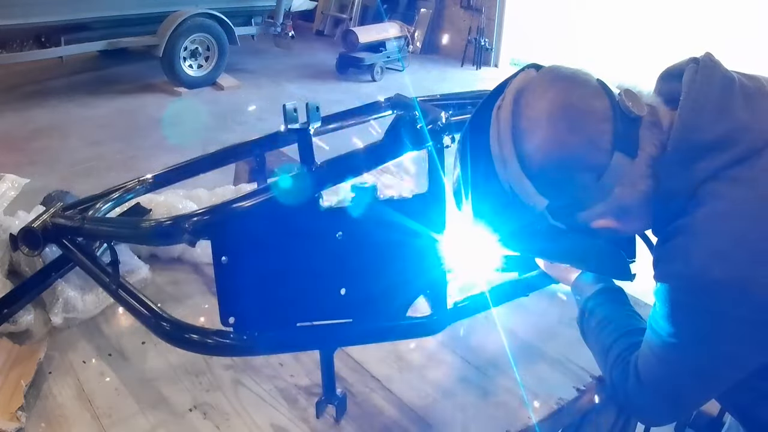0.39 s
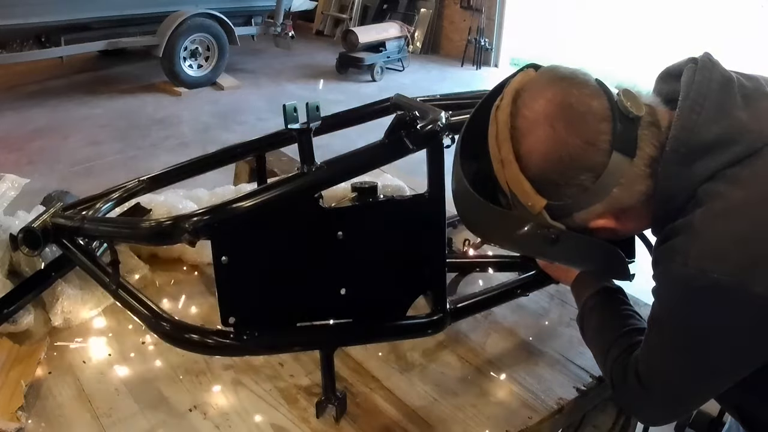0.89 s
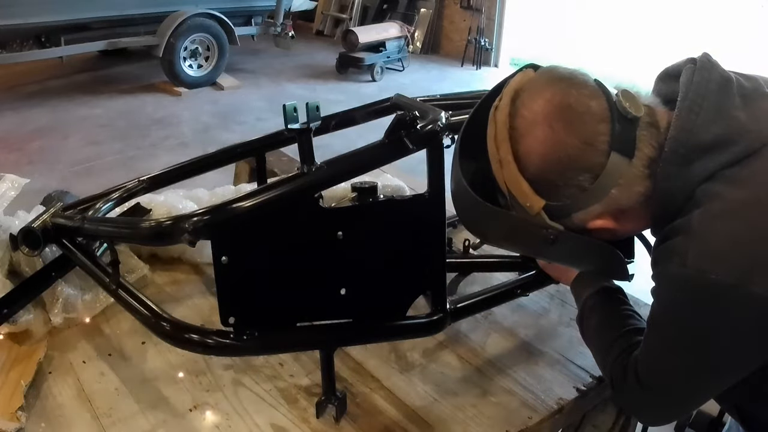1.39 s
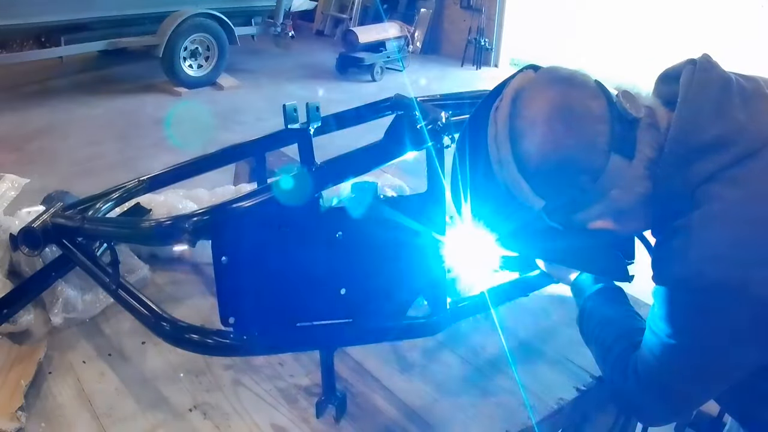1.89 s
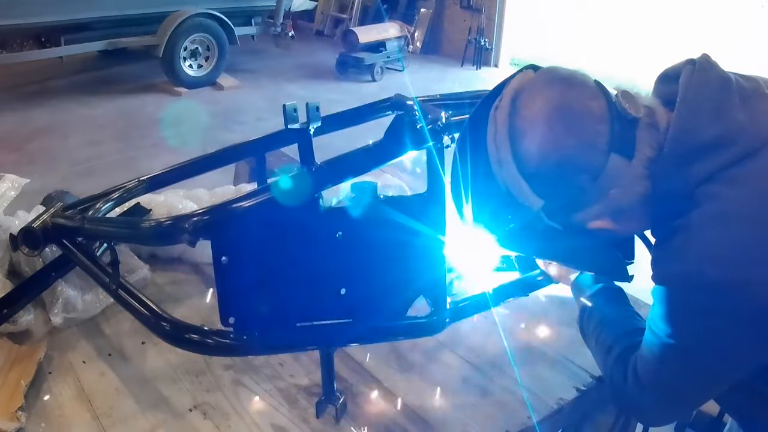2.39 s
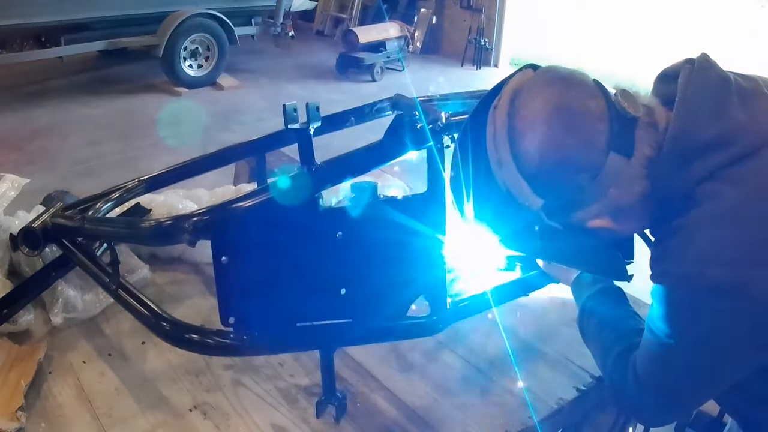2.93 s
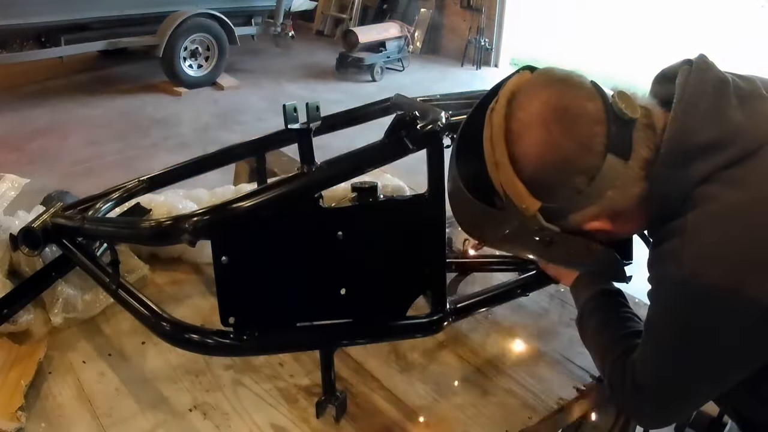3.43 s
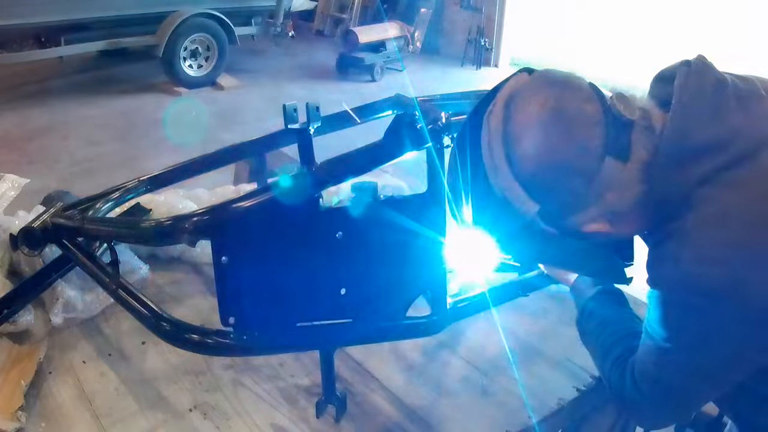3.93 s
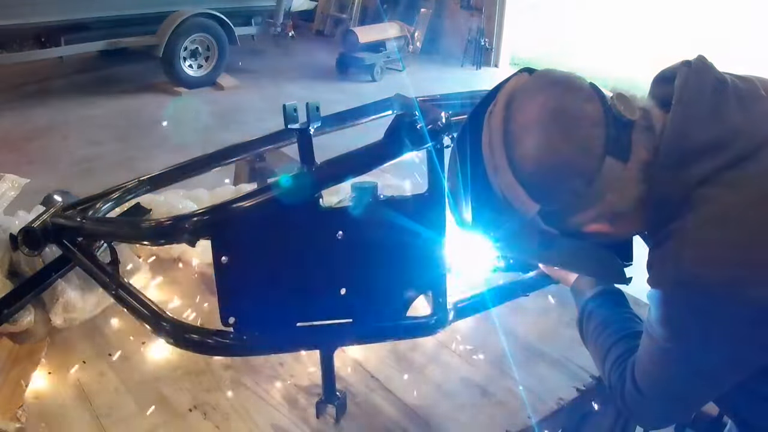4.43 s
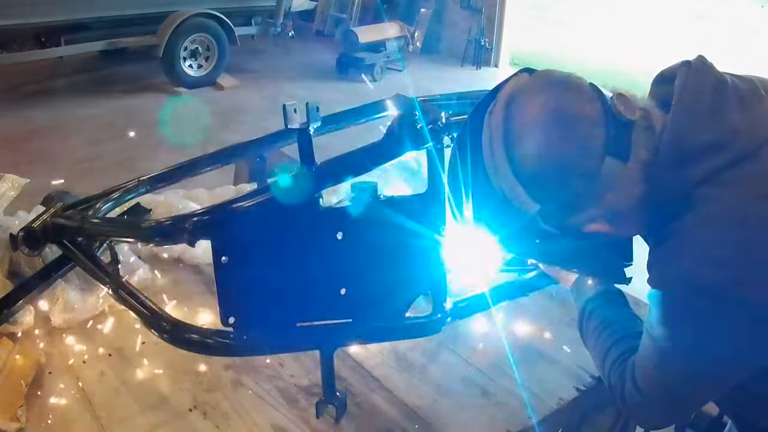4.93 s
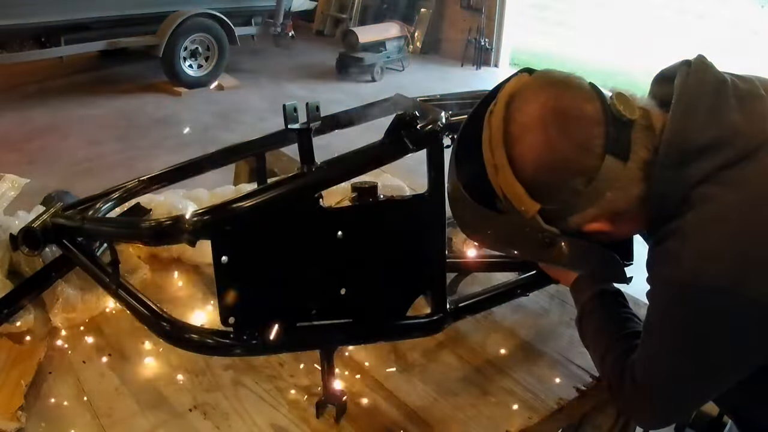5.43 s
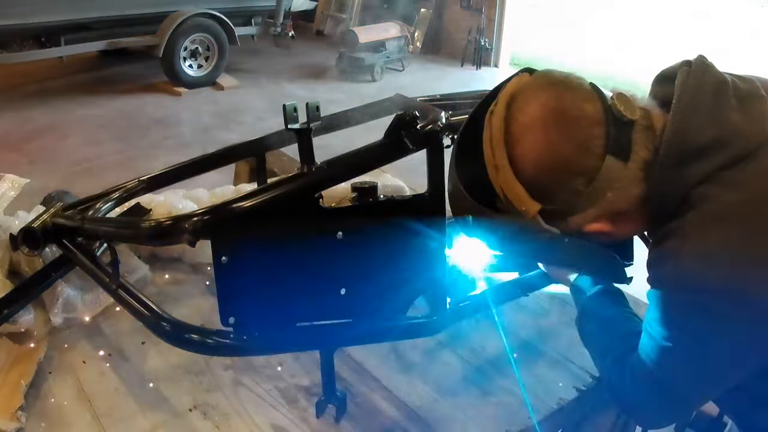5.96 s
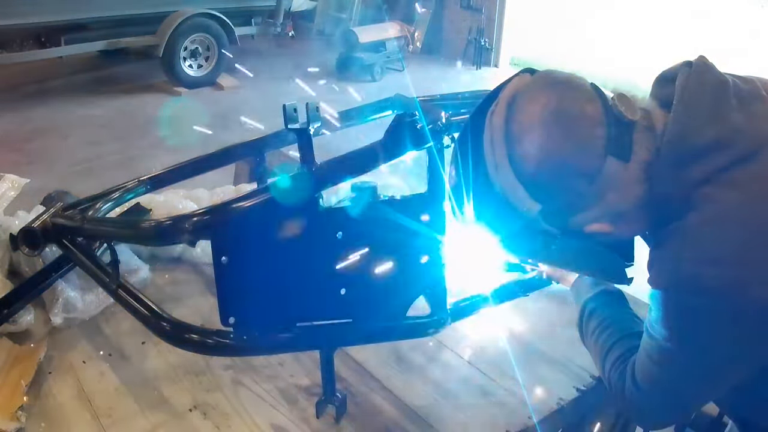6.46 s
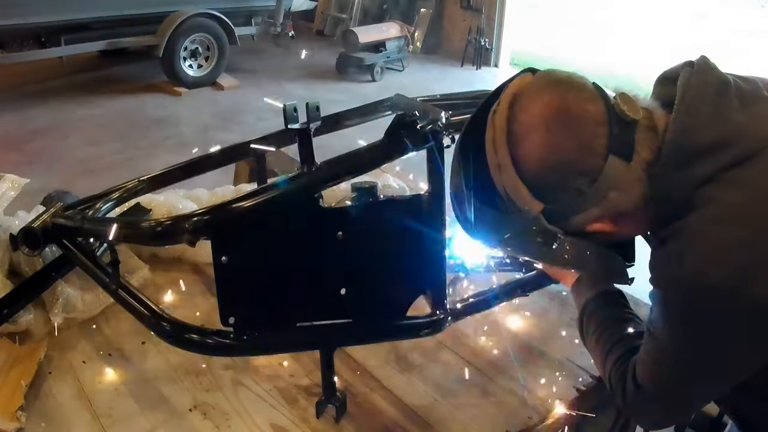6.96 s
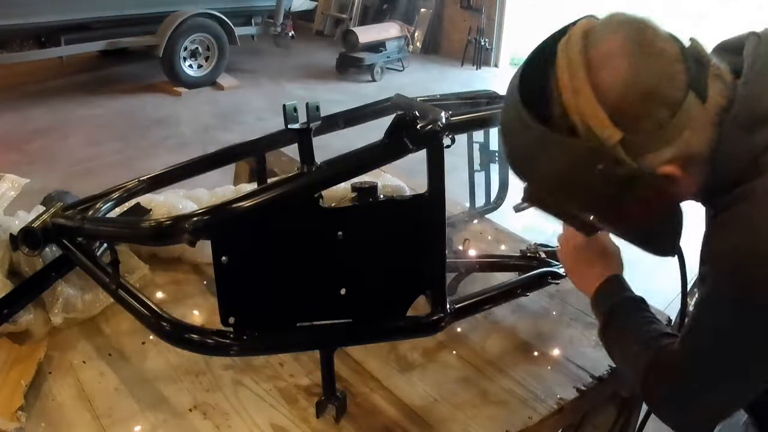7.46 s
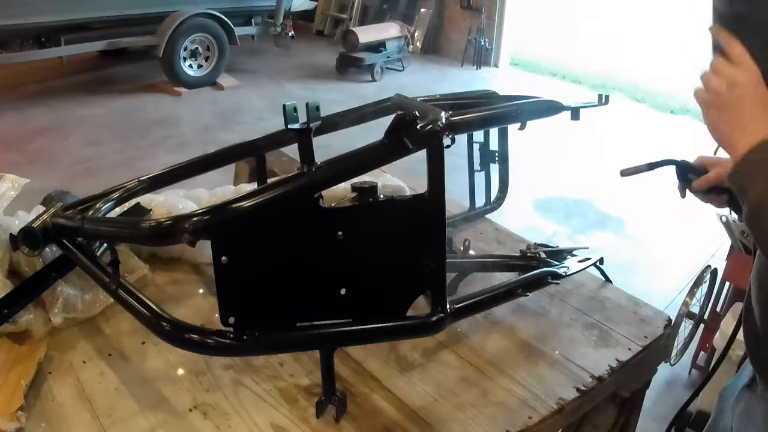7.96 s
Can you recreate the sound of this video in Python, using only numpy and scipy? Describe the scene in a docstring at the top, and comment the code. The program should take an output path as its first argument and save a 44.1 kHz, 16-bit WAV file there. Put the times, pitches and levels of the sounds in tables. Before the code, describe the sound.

A wire-feed welder crackles close by on a steel tube frame in a garage. Dense, loud, distorted pops and bright sizzle stop after half a second, a few lone snaps follow, then three more ragged welds come with pauses between. A steady fan hum and airy gas hiss continue underneath and are left alone at the end. The mono microphone overloads on the biggest pops.

```python
"""A wire-feed welding arc works in four short welds on a tubular steel frame in a garage. Each short circuit
of the wire ends in a sharp pop: a pressure kick, a puff of metal vapour and a low push of gas. Spatter and
plasma sizzle fill the welds; tubes, near surfaces, walls and a room tail answer. Under it all, and clearest
between welds, the machine's fan hums and the shielding gas hisses. The loudest pops overload a mono microphone."""
import sys
import numpy as np
from scipy import signal
from scipy.fft import rfft, irfft, next_fast_len
from scipy.io import wavfile
from scipy.ndimage import map_coordinates

SR = 44100
rng = np.random.default_rng(int(sys.argv[2]) if len(sys.argv) > 2 else 0)


def gain_from_db(level_db):
    """Convert decibel levels to linear amplitude factors (20 dB per decade)."""
    decades = np.asarray(level_db, float) / 20
    return 10 ** decades


def output_pcm(signal):
    """Save a mono or channel-first signal as 16-bit PCM at the path in sys.argv[1].

    Samples are clipped to [-1, 1] before scaling.
    """
    pcm = np.clip(np.atleast_2d(signal).T, -1, 1) * 32767
    wavfile.write(sys.argv[1], SR, np.round(pcm).astype(np.int16))


N = 357102  # length in samples


def unit(x):
    """Scales a signal to rms 1."""
    return x / np.sqrt(np.mean(x ** 2) + 1e-20)


def along(points, hz, column=1):
    """Reads one column of a frequency table on a log axis."""
    rows = np.transpose(points)
    return np.interp(np.log(hz + 1), np.log(rows[0] + 1), rows[column])


def wobble(rate):
    """A smooth random curve with rate knots a second."""
    knots = rng.standard_normal(int(N * rate / SR) + 4)
    return map_coordinates(knots, [np.arange(N) * rate / SR])


def coloured(points):
    """Noise of rms 1 with the given spectral shape."""
    size = next_fast_len(N)
    spectrum = rfft(rng.standard_normal(size))
    shape = gain_from_db(along(points, np.fft.rfftfreq(size, 1 / SR)))
    return unit(irfft(spectrum * shape, size)[:N])


def causal(points, size=4096):
    """The shortest causal (minimum-phase) response with the given spectrum, by folding its cepstrum."""
    spectrum = gain_from_db(along(points, np.fft.rfftfreq(size, 1 / SR)))
    cepstrum = irfft(np.log(spectrum), size)
    cepstrum[1:size // 2] *= 2
    cepstrum[size // 2 + 1:] = 0
    return irfft(np.exp(rfft(cepstrum)), size)[:size // 2]


def copies(rows):
    """Turns rows of delay and level into a response of single echoes."""
    ms, db = np.transpose(rows)
    return np.bincount(np.round(ms * SR / 1000).astype(int), gain_from_db(db))


def convolve(x, response):
    """Plays x through a response, cut to the scene's length."""
    return signal.fftconvolve(x, response)[:N]


# Fan and transformer tones. Each row: frequency in Hz, usual level in dB rms ahead of the input stage.
MACHINE_TONES = [(339, -71), (593.6, -60.5), (678, -71.5), (1186.6, -74), (1780, -70)]
# Spectral shape of the fan's air noise. Each row: frequency in Hz, relative level in dB per Hz.
FAN_COLOUR = [(25, -35.5), (100, -17), (200, -7), (240, -3), (600, -2.5), (800, -4), (2000, -6.5),
              (6000, -13), (11000, -11.5), (16000, -21)]


def machine():
    """The fan's rush of air and steady tones that waver slightly in level and together in pitch."""
    t = np.arange(N) / SR
    drift = 0.000324 * np.cumsum(wobble(2.74)) / SR  # seconds of phase drift
    hum = np.zeros(N)
    for hz, db in MACHINE_TONES:
        level = gain_from_db(db + 0.99 * wobble(6.9)) * np.sqrt(2)  # rms to peak
        hum += level * np.sin(2 * np.pi * hz * (t + drift))
    rush = gain_from_db(-59.0 + 0.44 * wobble(3.72)) * coloured(FAN_COLOUR)
    return hum + rush


# Spectral shape of gas leaving the nozzle. Each row: frequency in Hz, relative level in dB per Hz.
GAS_COLOUR = [(3000, -33), (5000, -7.5), (6000, -11), (8000, -4), (10000, 1), (11500, -31.5), (16000, -37)]
# Gas hiss over time. Each row: time in seconds, usual level of the direct hiss in dB rms ahead of the input
# stage, delay of a second arrival off the frame in ms, share of that arrival from 0 to 1.
NOZZLE_PATHS = [(0, -56.5, .2, .1), (1.1, -55, 0.13, 0), (1.7, -56, 0.21, 0.03), (3.6, -57.5, 0.167, 0.05),
                (5.7, -57.5, 0.18, 0.03), (7.25, -61.5, 0.15, .4), (7.5, -58.5, 0.328, 0.34),
                (7.75, -58.5, .5, 0.2), (8.1, -59, .85, 0.61)]


def gas():
    """Hiss heard twice; as the torch is lifted away the comb between both paths slides."""
    s, *columns = np.transpose(NOZZLE_PATHS)
    samples = np.arange(N)
    db, delay_ms, share = [np.interp(samples / SR, s, column) for column in columns]
    direct = coloured(GAS_COLOUR)
    reflected = map_coordinates(direct, [samples - delay_ms * SR / 1000], mode="wrap")
    return gain_from_db(db + 0.88 * wobble(2.0)) * (direct + share * reflected)


# Ring of the tubes. Each row: frequency in Hz, starting level in dB, t60 in seconds.
TUBE_MODES = [(265, -47, 0.13), (419, -49.5, 0.13), (4483, -24.5, 0.012), (4907, -27, 0.0076),
              (5135, -19.5, 0.0057), (6875, -20.5, 0.0051)]


def frame(x):
    """The steel tubes ring briefly after every pop, as a bank of decaying sines."""
    t = np.arange(SR // 5) / SR
    ring = sum(gain_from_db(db - 60 * t / t60) * np.sin(2 * np.pi * hz * t) for hz, db, t60 in TUBE_MODES)
    return convolve(x, ring)


# Copies from tubes and bench close to the arc. Each row: delay in ms, level in dB before colouring.
NEAR_COPIES = [(.36, -15), (.59, -12), (.86, -16), (1.22, -15), (1.7, -17), (2.1, -19), (2.7, -21),
               (3.4, -20)]
# Echoes of hard surfaces further off. Each row: delay in ms, level in dB before colouring.
WALL_ECHOES = [(7.66, -7), (13.06, -20), (14.74, -21), (15.9, -19), (20.34, -22), (24.9, -22), (33.3, -23)]
# Tubes and walls return less bass. Each row: frequency in Hz, gain in dB.
SURFACE_COLOUR = [(300, -10.5), (1800, -1), (4000, 8.5), (16000, 2)]
# The garage's tail. Each row: frequency in Hz, t60 in seconds, relative starting level in dB.
TAIL_BANDS = [(200, 0.866, 0), (503, 0.81, -2), (1260, 0.74, -6), (2190, 0.69, 10.5), (4480, 0.81, -2),
              (9780, 0.48, -3.5), (15000, 0.245, 2)]


def garage(x):
    """Direct sound and tube ring, near copies, walls, then a tail that swells in and dies band by band."""
    bright = convolve(x, causal(SURFACE_COLOUR))
    near = convolve(bright, copies(NEAR_COPIES))
    walls = convolve(bright + 0.15 * near, copies(WALL_ECHOES))
    hz, t, bands = signal.stft(rng.standard_normal(SR + SR // 2), SR, nperseg=256)
    start_db = along(TAIL_BANDS, hz, column=2)[:, None]
    t60 = along(TAIL_BANDS, hz)[:, None]
    tail = signal.istft(bands * gain_from_db(start_db - 60 * t / t60), SR, nperseg=256)[1]
    tail *= np.clip(np.arange(len(tail)) / SR / 0.0088 - .2, 0, 1)  # silent at first, full after about 11 ms
    return x + frame(x) + near + walls + gain_from_db(-31.0) * convolve(x, tail)


def bursts(times, db, fizz_db, fizz_ms):
    """Pressure kicks, each with a random puff of metal vapour that falls 60 dB in fizz_ms."""
    t = np.arange(256)  # samples after the kick
    fade = gain_from_db(fizz_db - 60 * t / (fizz_ms * SR / 1000))
    puff = fade * rng.standard_normal((len(times), len(t)))
    shape = gain_from_db(db)[:, None] * ((t == 0) + puff)
    where = np.round(np.asarray(times) * SR).astype(int)[:, None] + t
    return np.bincount(where.ravel(), shape.ravel(), N + SR)[:N]


# While the arc burns. Each row: start in seconds, end in seconds, level of the smallest spatter in dB, usual
# sizzle level in dB (both before the snap colour), offset of the low push in dB.
WELD_SPANS = [(0, 0.544, -42, -31, -0.5), (2.001, 3.091, -8, -47, 1.4), (3.897, 5.241, -27, -37, 1),
              (6.216, 6.982, -23, -37, 2.5)]


def spatter():
    """Small random metal pops at about 50 a second in each weld: many small, a few larger."""
    pops = np.zeros(N)
    for start, end, smallest_db, _, _ in WELD_SPANS:
        draw = rng.random((round(50 * (end - start)), 2))
        times = start + (end - start) * draw[:, 0]
        size_db = smallest_db - 4 * np.log(1 - .9 * draw[:, 1])
        pops += bursts(times, size_db, fizz_db=-19.5, fizz_ms=5.7)
    return pops


def sizzle():
    """The plasma's noise while the arc burns, flickering slightly in level."""
    t = np.arange(N) / SR
    noise = np.zeros(N)
    for start, end, _, sizzle_db, _ in WELD_SPANS:
        burning = (t > start) * (t < end)
        noise += gain_from_db(sizzle_db + 0.8 * wobble(60)) * rng.standard_normal(N) * burning
    return noise


# Ordinary dripping of the wire between loud pops. Each row: time in seconds, short circuits per second,
# usual kick level in dB before scatter.
DRIP_RATE = [(0, 140, 14), (.12, 125, -4), (.14, 80, 0), (.25, 80, -6.5), (.27, 140.3, -3.5), (.36, 130, 5),
             (.5, 121.3, 0), (.56, 129.3, -1.5), (2.0, 80, -6), (2.25, 104, -0.5), (3.08, 85, -2.5),
             (3.9, 72, -1), (4.07, 65, -10.5), (4.1, 110, 0.5), (4.16, 95, -6), (4.2, 68, -7),
             (4.6, 57.4, -1.5), (5.24, 62, -6), (6.23, 86, -2.5), (6.355, 104, 3.5), (6.43, 66, -4.5),
             (6.6, 55, -4), (6.98, 60, -3)]
# The wire sticks and nothing drips. Each row: from in seconds, to in seconds.
WIRE_STALLS = [(.143, .16), (.385, .4), (2.768, 2.783), (4.012, 4.043), (4.28, 4.312), (4.372, 4.391),
               (4.676, 4.701), (4.842, 4.857), (4.996, 5.025), (6.3, 6.315), (6.36, 6.389), (6.452, 6.508)]


def drips():
    """Smaller pops share out the time between two loud ones; the beat before a loud one is longer."""
    wait, jitter, scatter_db = 1.4, .09, 3  # beats for a big drop to grow; beat scatter; size scatter in dB
    after_s = .03  # dripping may run this long past the weld's end
    s = np.transpose(POP_STRIKES)[0]
    before, gap = s[:-1], np.diff(s)
    at, rate, level_db = np.transpose(DRIP_RATE)
    burning = sum((before > w[0]) & (before + gap < w[1] + after_s) for w in WELD_SPANS)
    shorts = gap * np.interp(before + gap / 2, at, rate)
    count = burning * np.round(shorts - wait).clip(0)
    beat = np.arange(1, 16)
    chance = rng.standard_normal((2, len(gap), len(beat)))
    beat_s = (gap / (count + wait))[:, None]
    times = before[:, None] + beat_s * (beat + jitter * chance[0])
    size_db = np.interp(times, at, level_db) + scatter_db * chance[1].clip(-3, 1.5)
    stalled = np.any([(times > a) & (times < b) for a, b in WIRE_STALLS], axis=0)
    used = (beat <= count[:, None]) & ~stalled
    return times[used], size_db[used]


# Colour of the low push of expanding gas. Each row: frequency in Hz, gain in dB.
PUSH_COLOUR = [(60, -40), (250, -17), (450, -10), (1000, -5), (1550, -3.5), (2200, -14.5), (5000, -48.5)]


def gas_push(s, db):
    """Each pop's gas expands as a low thud; big bursts move more gas."""
    ends, push_db = np.transpose(WELD_SPANS)[[1, 4]]
    weld = np.searchsorted(ends, s).clip(0, len(WELD_SPANS) - 1)
    push = gain_from_db(0.79 * db + push_db[weld] + rng.normal(0, 2.2, len(s)))
    kicks = np.bincount(np.round(s * SR).astype(int), push, N)
    return convolve(kicks, causal(PUSH_COLOUR))


# The loudest pops and the lone strikes, as the molten bridge bursts and the arc lights again.
# Each row: time in seconds, kick level in dB ahead of the room and the input stage.
POP_STRIKES = [(0.0323, 5), (0.0541, 5), (0.0667, 4), (0.0789, 5), (0.1295, 4), (0.1606, 5), (0.1734, 5),
               (0.1858, 4), (0.2018, 4), (0.2158, 5), (0.2315, 5), (0.2456, 5), (0.2699, 6), (0.3016, 4),
               (0.3615, 6), (0.3788, 5), (0.4, 3), (0.4088, 6), (0.4177, 5), (0.4269, 6), (0.4358, 5),
               (0.445, 4), (0.461, 7), (0.499, 5), (0.5173, 3), (0.54, 0), (0.5626, -5), (1.7348, 5),
               (1.7833, 4), (1.8416, 5), (1.8971, 4), (1.91, 5), (1.9269, 1), (1.9368, -5), (2.0089, 4),
               (2.0373, 1), (2.0954, 1), (2.1689, 2), (2.203, 7), (2.2585, 3), (2.2965, 2), (2.3202, 2),
               (2.3438, 6), (2.3682, 3), (2.4698, 4), (2.4917, 1), (2.591, 2), (2.6085, 4), (2.7084, 3),
               (2.7586, 3), (2.7836, 5), (2.8155, 6), (2.8339, 2), (2.8888, 3), (2.9054, 3), (2.9732, 2),
               (3.0149, 6), (3.0299, 2), (3.0456, 2), (3.078, -4), (3.8061, -9), (3.906, 5), (3.9207, 6),
               (3.9359, 3), (3.9654, 5), (3.9866, 6), (4.0438, 6), (4.0827, 5), (4.0941, 6), (4.1298, 5),
               (4.1392, 6), (4.1608, 5), (4.1855, 4), (4.2341, 4), (4.3123, 7), (4.3311, 4), (4.3917, 2),
               (4.4426, 6), (4.4827, 5), (4.5049, 5), (4.5259, 5), (4.6134, 6), (4.7015, 7), (4.7358, 7),
               (4.7556, 5), (4.7721, 4), (4.806, 2), (4.8573, 6), (4.9309, 4), (4.9454, 5), (4.9923, 3),
               (5.0252, 6), (5.1125, 4), (5.1495, 3), (5.2403, -6), (6.0003, -1), (6.1593, -5), (6.2265, 6),
               (6.2788, 1), (6.3157, 2), (6.3351, 7), (6.3543, 2), (6.3891, 3), (6.4011, 3), (6.4798, 0),
               (6.5086, 3), (6.5435, 2), (6.5669, 4), (6.6489, 3), (6.6759, 3), (6.7711, 4), (6.803, 4),
               (6.8762, 2), (6.9856, -6)]
# Spectral shape of a pop at the microphone. Each row: frequency in Hz, relative level in dB per Hz.
SNAP_COLOUR = [(100, -33.5), (260, -29.5), (900, -23.5), (2400, -26), (3400, -20), (4200, -14.5),
               (4800, -10.5), (5900, -11.5), (6700, -5), (9900, 2.5), (12600, -9), (13500, -12.5),
               (14800, -11), (17000, -17)]


def arc():
    """Big and dripping pops, spatter and sizzle share one sharp colour; a low push joins each big or drip pop."""
    s, db = np.hstack([np.transpose(POP_STRIKES), drips()])
    pops = bursts(s, db, fizz_db=-19, fizz_ms=6)
    snap = causal(SNAP_COLOUR)
    snap /= np.abs(snap).max()
    return convolve(pops + spatter() + sizzle(), snap) + gas_push(s, db)


def scene():
    """One microphone feeds both channels."""
    mono = garage(arc()) + machine() + gas()
    return np.tile(mono, (2, 1))


def roll_off(x):
    """The treble ends steeply here."""
    return signal.sosfilt(signal.butter(12, 16820, fs=SR, output="sos"), x)


# Band of the recorder. Each row: frequency in Hz, gain in dB.
RECORDER_BAND = [(30, -11), (130, -5), (205, -7), (245, -0.5), (15800, -0.5), (15950, -60)]


def record(dry):
    """The input stage clips the biggest pops; the recorder then trims bass and top treble."""
    top, hardness = .99, 7  # clipping ceiling (full scale 1); sharpness of the knee
    loud = gain_from_db(-1.5) * dry
    clipped = loud / (1 + np.abs(loud / top) ** hardness) ** (1 / hardness)
    band = gain_from_db(along(RECORDER_BAND, np.fft.rfftfreq(N, 1 / SR)))
    mix = irfft(rfft(clipped) * band, N)
    return roll_off(mix)


dry = scene()
out = record(dry)
output_pcm(out)
```